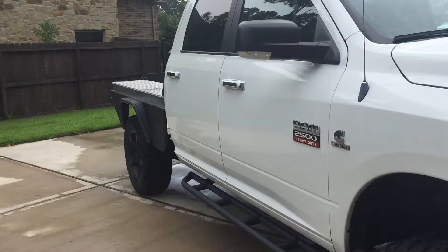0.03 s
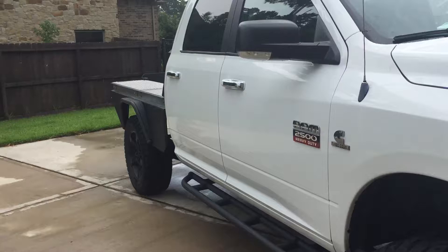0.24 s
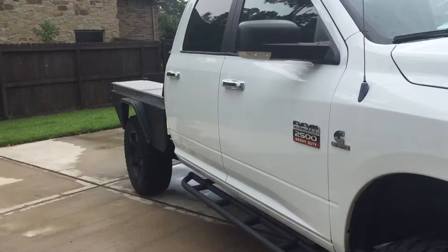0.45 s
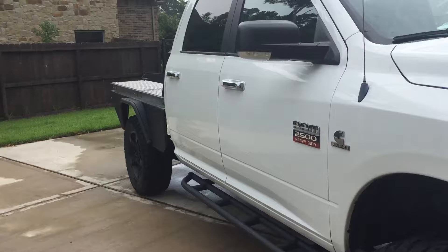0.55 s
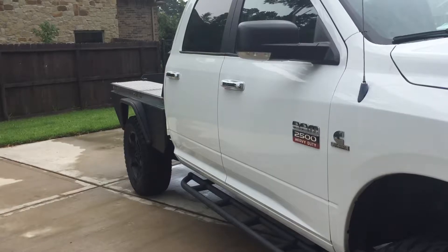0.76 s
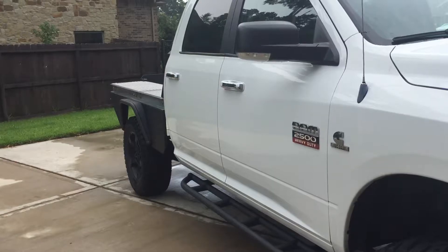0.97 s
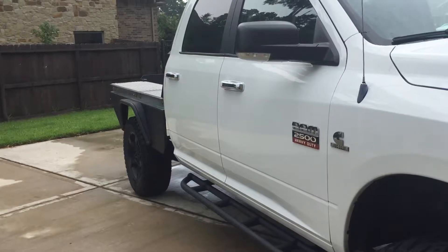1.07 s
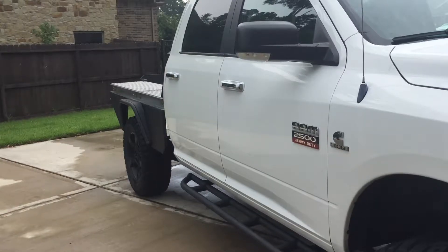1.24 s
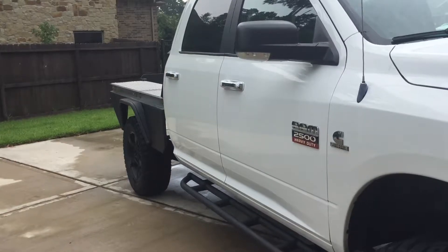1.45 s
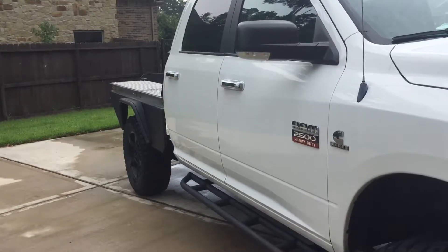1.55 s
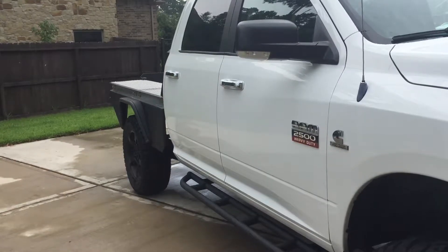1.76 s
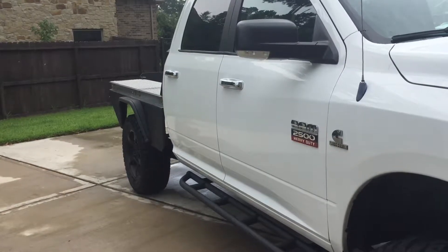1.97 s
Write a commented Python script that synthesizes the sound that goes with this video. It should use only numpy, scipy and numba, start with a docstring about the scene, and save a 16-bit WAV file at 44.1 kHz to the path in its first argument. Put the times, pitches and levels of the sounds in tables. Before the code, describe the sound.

A large diesel truck idles outdoors, heard in mono from a phone a few metres away. After silence until 0.12 seconds it opens abruptly and continues evenly to the end. Around forty-two soft knocks a second ride a low drone, wandering boom and breathy fan roar. Irregular thuds and clatters punctuate it; loose metal rings briefly near 0.9, 1.2 and 1.6 seconds. A faint motor hum, thin buzz and hiss lie underneath.

```python
"""A six-cylinder diesel pickup idles on a driveway, heard from a phone a few metres off its flank.
Firings drone as steady tones and knock as noise bursts ringing the block; thuds come irregularly.
Coloured noise makes the roar of fan and gas and a faint hiss; sliding tones make a wandering low boom.
Valve gear clatters in noise bursts, loose metal rings, and an electric motor close by (perhaps
a compressor) buzzes as many multiples of one low pitch. The sound starts after a short silence."""
import sys
import numpy as np
from scipy import signal
from scipy.fft import rfft, irfft
from scipy.io import wavfile
from scipy.ndimage import uniform_filter1d
from numba import njit

SR = 44100
rng = np.random.default_rng(int(sys.argv[2]) if len(sys.argv) > 2 else 0)


def volts_from_decibels(level):
    """Turn decibel levels (scalar or array-like) into linear amplitude factors."""
    exponent = np.asarray(level, float) / 20
    return 10 ** exponent


def persist_wave(psi):
    """Save psi, clipped to +-1, as 16-bit WAV."""
    counts = np.round(np.clip(psi, -1, 1) * 32767).astype(np.int16)
    wavfile.write(sys.argv[1], SR, np.atleast_2d(counts).T)


N = 88464  # samples, about 2 s
FIRING_HZ = 41.946  # firings per second, all cylinders together


def level(x, db):
    """Scale a sound to an rms level in dB."""
    return x * volts_from_decibels(db) / np.sqrt(np.mean(x ** 2))


def curve(table):
    """Read a table of (time, level) at every sample, with straight lines between its points."""
    table = np.array(table, float)
    return np.interp(np.arange(N) / SR, table[:, 0], table[:, 1])


def on_log_hz(table, hz):
    """Read a table of (Hz, dB) at the given pitches, with straight lines over log pitch."""
    table = np.array(table, float)
    return np.interp(np.log(hz), np.log(table[:, 0]), table[:, 1])


def walk(rate):
    """Smooth random wandering around 0: a new value every 1 / rate seconds, spread about 0.7."""
    hold = int(SR / rate)
    steps = np.repeat(rng.standard_normal(N // hold + 1), hold)
    smooth = uniform_filter1d(uniform_filter1d(steps, hold), hold)
    return 0.93 * smooth[:N]


@njit
def svf(x, hz, width):
    """A resonance: a state-variable band-pass filter with gain 1 at its centre; hz and width in Hz."""
    y, band, low = np.empty(len(x)), 0., 0.
    g, damping = np.tan(np.pi * hz / SR), width / hz
    for i in range(len(x)):
        v = (band + g * (x[i] - low)) / (1 + g * (g + damping))
        band, low, y[i] = 2 * v - band, low + 2 * g * v, damping * v
    return y


def tones(base_hz, orders, waver_db):
    """Steady multiples of a rotation, each wavering a little in level on its own."""
    turn = 2 * np.pi * base_hz * np.arange(N) / SR
    out = 0
    for multiple, db in orders:
        strength = 2 ** .5 * volts_from_decibels(db + waver_db * walk(7.58))  # a sine peaks at root 2 times its rms
        out = out + strength * np.sin(multiple * turn + 2 * np.pi * rng.random())
    return out


def turbulence(colour, flicker_db, per_s):
    """Rushing air: coloured noise in bands 1/8 octave apart that flicker on their own; rms 1."""
    hz = np.maximum(np.arange(N // 2 + 1) * SR / N, 1)
    noise = rfft(rng.standard_normal(N)) * volts_from_decibels(on_log_hz(colour, hz))
    out = 0
    for octave in np.arange(3.5, 14.4, 1 / 8):
        share = np.clip(1 - 8 * abs(np.log2(hz) - octave), 0, 1)  # overlapping triangular bands
        out = out + volts_from_decibels(flicker_db * walk(per_s)) * irfft(noise * share, N)
    return level(out, 0)


def hiss():
    """A faint airy hiss: high coloured noise that swells and sinks."""
    # colour of the hiss, relative: f/Hz, level/dB per Hz
    hiss_colour = [(2000, 1), (5500, 1.5), (7300, -5), (8300, 1.5), (9700, -0.5), (10400, -6.5),
                   (12000, -2.5), (14000, -2.5), (15700, -4)]
    # how the hiss swells and sinks: t/s, level/dB rms
    breath = [(0.14, -69.5), (0.164, -71.5), (0.23, -68), (0.252, -71.5), (0.308, -67), (0.368, -76),
              (1.016, -71), (1.97, -70)]
    return volts_from_decibels(curve(breath)) * turbulence(hiss_colour, flicker_db=0.58, per_s=8.5)


def motor():
    """An electric motor: a low hum and a thin buzz, all multiples of one pitch, of uneven strength."""
    motor_hz = 59.028  # just under mains pitch
    # hum, before it wavers: multiple of motor_hz, level/dB rms
    hum = [(1, -55.5), (2, -52.5), (3, -53), (4, -57.5), (5, -55.5), (6, -64.5), (8, -59), (9, -60.5)]
    # outline of the housing's buzz, before scatter and wavering: f/Hz, level/dB rms
    buzz_outline = [(1200, -82), (2500, -96), (5000, -107), (7300, -107), (7650, -100), (7850, -92),
                    (8100, -100), (8330, -94), (8560, -107), (8800, -98), (9200, -103), (9650, -97),
                    (10200, -108), (13000, -108), (15500, -111)]
    scatter_db = 2.5
    multiples = np.arange(20, 264)
    buzz_db = on_log_hz(buzz_outline, multiples * motor_hz)
    buzz_db = buzz_db + scatter_db * rng.standard_normal(len(multiples))
    return tones(motor_hz, hum, 2.2) + tones(motor_hz, zip(multiples, buzz_db), 1.4)


def rings():
    """Loose metal parts ring briefly: a close pair of tones each, with a fast onset and a dying tail."""
    # each ring: start t/s, f/Hz, level/dB of its main tone (scale of the envelope), time to fall 60 dB/s
    ring_table = [(.2, 5800, -74, .15), (.858, 1780, -50, .05), (.87, 2110, -53, .1),
                  (1.16, 2500, -56, .07), (1.228, 2130, -51, .09), (1.229, 3400, -59, .08),
                  (1.234, 1880, -52, .05), (1.562, 1870, -46, .11), (1.598, 2010, -52, .05),
                  (1.685, 1720, -51, .07), (1.779, 1750, -57, .1)]
    pair_ratio = 1.02  # pitch of the weaker partner over the main tone
    t, out = np.arange(N) / SR, 0
    for at, hz, db, t60 in ring_table:
        since = np.maximum(t - at, 0)
        shape = (1 - np.exp(-since / 0.0025)) * np.exp(-np.log(1000) * since / t60)
        main = np.sin(2 * np.pi * hz * since)
        partner = 0.24 * np.sin(2 * np.pi * pair_ratio * hz * since)
        out = out + volts_from_decibels(db) * shape * (main + partner)
    return out


def clatters():
    """Valve gear rattles up for a moment: short swells of noise, each in one band."""
    # each clatter: middle t/s, peak level/dB rms, centre f/Hz
    clatter_table = [(.172, -62, 3400), (.216, -53, 1400), (.55, -55, 1500), (.817, -63, 3400),
                     (.888, -51, 1800), (.915, -62, 3300), (1.424, -53, 1500), (1.909, -53, 1700),
                     (1.932, -52, 1700)]
    length_s, relative_width = .008, .5  # time from the peak down to 1/e; band width over centre
    t, out = np.arange(N) / SR, 0
    for at, db, hz in clatter_table:
        width = relative_width * hz
        rattle = svf(svf(rng.standard_normal(N), 1. * hz, width), 1. * hz, width)
        out = out + level(rattle, db) * np.exp(-((t - at) / length_s) ** 2)
    return out


def boom():
    """Low sliding tones that swell and fade under the drone."""
    # each swell: centre t/s, length/s (between its 1/e points), f/Hz at the centre, slide/Hz per s,
    # level/dB rms of the tone at its peak
    swells = [(.14, 0.078, 110, 0, -43), (.25, 0.1, 124.5, -350, -36), (0.339, 0.093, 116, 252, -39.5),
              (0.446, .06, 84.4, 2, -38.5), (0.437, .06, 127, -300, -44), (0.554, 0.057, 59, 0, -38),
              (0.617, .07, 61, 100, -42), (0.578, 0.089, 95.5, -60, -46.5), (.705, 0.054, 107, 500, -38),
              (.95, 0.1, 169.7, 81, -41.5), (0.991, .14, 90.6, 102, -46), (1.263, 0.11, 103, 60, -45),
              (1.294, 0.1, 60, -11, -40.5), (1.451, 0.17, 80, 98, -51), (1.519, 0.052, 72.5, 200, -44),
              (1.649, 0.029, 97, 300, -41), (1.701, 0.062, 134.5, -600, -37.5),
              (1.758, 0.037, 116.5, 0, -40.5), (1.815, 0.078, 115, -300, -38), (1.915, 0.053, 114, 0, -40),
              (1.949, 0.074, 89, -400, -41), (1.95, 0.11, 172, 2, -44.5)]
    t, out = np.arange(N) / SR, 0
    for at, length, hz, slide, db in swells:
        d = t - at
        turn = 2 * np.pi * (hz * d + slide * d ** 2 / 2 + rng.random())
        out = out + 2 ** .5 * volts_from_decibels(db) * np.exp(-(2 * d / length) ** 2) * np.sin(turn)
    return out


def roar():
    """Fan, intake and exhaust gas: coloured noise with flickering bands."""
    # colour of the roar, relative: f/Hz, level/dB per Hz
    roar_colour = [(15, -27), (40, -8), (87, -0.5), (140, -4), (200, -6), (260, -8.5), (370, -12),
                   (400, -12.5), (476, -11.5), (624, -12.5), (714, -17.5), (936, -16), (1600, -24.5),
                   (1890, -26), (2500, -32), (2840, -37.5), (3430, -36.5), (4870, -45), (5570, -44.5),
                   (7300, -51), (16000, -63)]
    rms_db = -42  # before the engine load sways it
    return volts_from_decibels(rms_db) * turbulence(roar_colour, flicker_db=2.5, per_s=14.01)


def drone():
    """The exhaust drones on steady multiples of the firing rate."""
    # tones, before they waver: multiple of the firing rate, level/dB rms
    exhaust = [(3, -53.5), (4, -54.5), (5, -47), (6, -60), (7, -64.5), (8, -62), (9, -61.5), (11, -66.5),
               (15, -68.5)]
    return tones(FIRING_HZ, exhaust, waver_db=-3)  # the wander goes both ways, so the sign is free


def thuds():
    """Hard knocks thud out of the drone at irregular moments; each is a push of about one cycle."""
    # each thud: middle t/s, peak level/dB of its envelope, f/Hz
    thud_table = [(.173, -35, 240), (.389, -35, 240), (.509, -36, 290), (.58, -34, 200), (1.003, -35, 250),
                  (1.103, -35, 240), (1.198, -33, 230), (1.343, -30, 280), (1.514, -33, 260),
                  (1.532, -34, 300), (1.961, -35, 230), (1.986, -32, 250)]
    thud_cycles = .7  # cycles from the peak of the envelope down to 1/e
    t, out = np.arange(N) / SR, 0
    for (at, db, hz), turn in zip(thud_table, rng.random((len(thud_table), 1))):
        cycles = (t - at) * hz
        out = out + volts_from_decibels(db) * np.exp(-(cycles / thud_cycles) ** 2) * np.sin(2 * np.pi * (cycles + turn))
    return out


def knock():
    """Each firing is a short burst that rings the block; cylinders differ, modes swell on their own."""
    # strength of each cylinder's knock in firing order, relative: level/dB
    cylinder_db = [0, -1, -1.5, -.5, -1, 0]
    # modes of the engine block, before the load sways them: f/Hz, width/Hz, level/dB rms
    block = [(550.7, 46, -59), (630.4, 40, -58.5), (804.6, 53, -58.5), (908, 37, -61.5), (1077, 143, -61),
             (1328, 37, -65.5), (1507, 27, -78), (1720, 62, -68), (1878, 54, -66), (2056, 46, -69.5),
             (2490, 100, -74), (3440, 180, -83.5), (3780, 250, -87), (5530, 260, -88)]
    firing_s, knock_s = .142, 0.013  # one firing of the first cylinder; decay of a burst to 1/e
    scatter_db, mode_wander_db = 1.5, 2.8  # spread between firings; scale of each mode's wander
    cycles = (np.arange(N) / SR - firing_s) * FIRING_HZ + 12  # 12 spare firings keep the count positive
    n = cycles.astype(int)
    db = np.array(cylinder_db)[n % 6] + scatter_db * rng.standard_normal(n[-1] + 1)[n]
    since_firing = (cycles % 1) / FIRING_HZ
    burst = volts_from_decibels(db) * np.exp(-since_firing / knock_s)
    out = 0
    for hz, width, mode_db in block:
        shake = burst * volts_from_decibels(mode_wander_db * walk(17.78)) * rng.standard_normal(N)
        ringing = svf(svf(shake, 1. * hz, 2. * width), 1. * hz, 1. * width)
        out = out + level(ringing, mode_db)
    return out


def engine():
    """The engine load sways knock and roar together."""
    # engine load, of which only the swing around its mean counts: t/s, level/dB
    load_table = [(0.14, -49), (0.338, -50), (1.05, -49), (1.758, -49.5), (1.98, -48)]
    load = curve(load_table)
    return volts_from_decibels(load - load.mean()) * (knock() + roar())


def scene():
    """Truck and electric motor together, in one channel."""
    background = hiss() + motor()
    truck = rings() + clatters() + boom() + drone() + thuds() + engine()
    return (background + truck)[None]


def band_limit(x):
    """A steep low-pass at the top of the band."""
    return signal.sosfilt(signal.butter(12, 16300, fs=SR, output="sos"), x)


def record(dry):
    """The microphone cuts deep bass and the very top, and opens abruptly after a silence."""
    mic_cut_hz, top_hz, start_s = 42, 15750, .1204
    heard = signal.sosfilt(signal.butter(3, mic_cut_hz, "high", fs=SR, output="sos"), dry)
    # steep low-pass: order 10, 0.2 dB ripple, 40 dB down above the top
    heard = signal.sosfilt(signal.ellip(10, .2, 40, top_hz, fs=SR, output="sos"), heard)
    opened = np.arange(N) >= start_s * SR
    return band_limit(heard * opened)


dry = scene()
out = record(dry)
persist_wave(out)
```